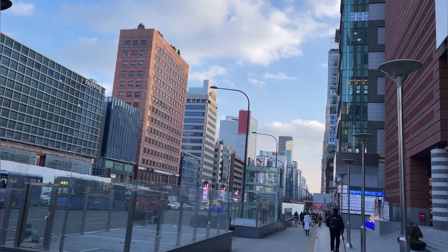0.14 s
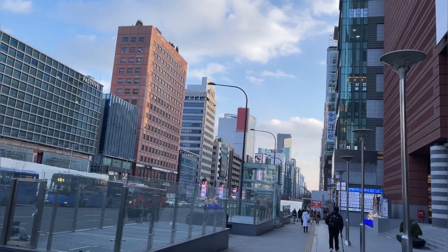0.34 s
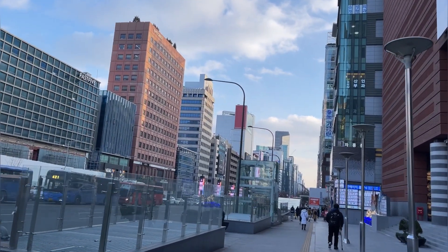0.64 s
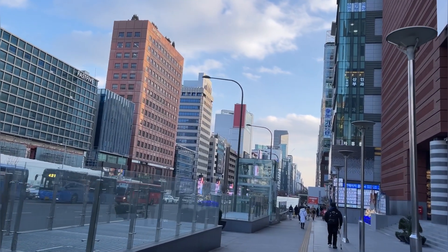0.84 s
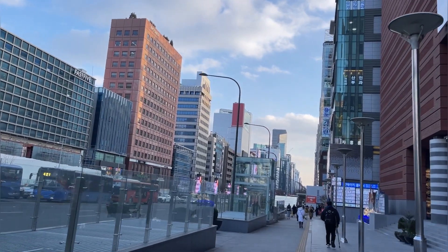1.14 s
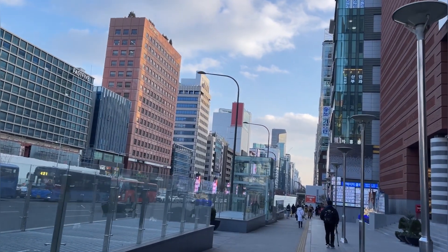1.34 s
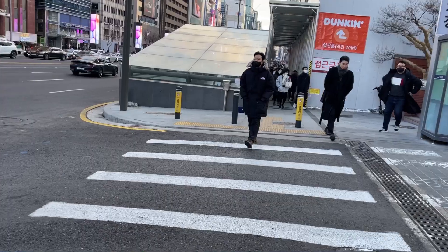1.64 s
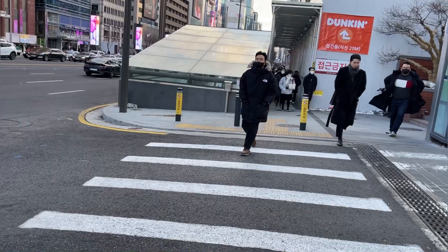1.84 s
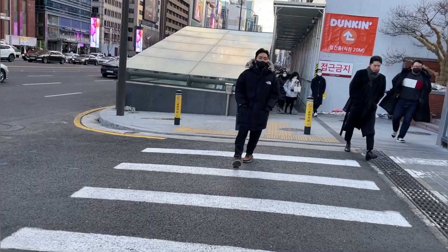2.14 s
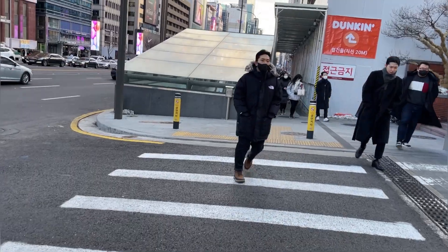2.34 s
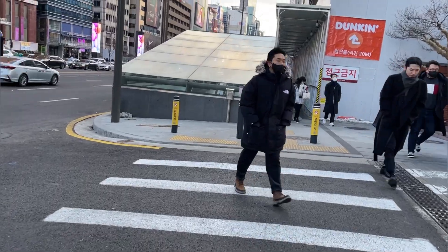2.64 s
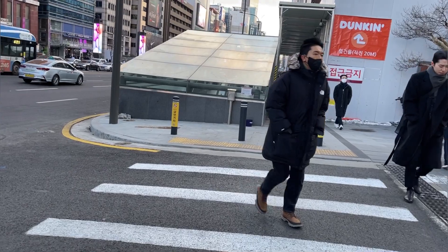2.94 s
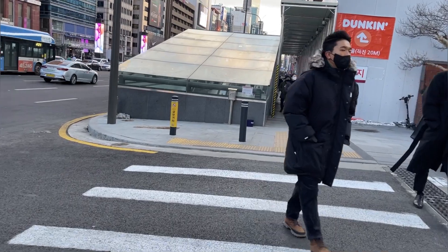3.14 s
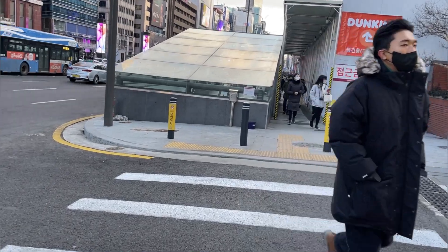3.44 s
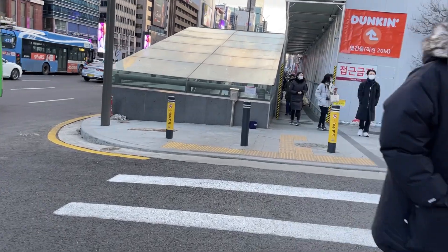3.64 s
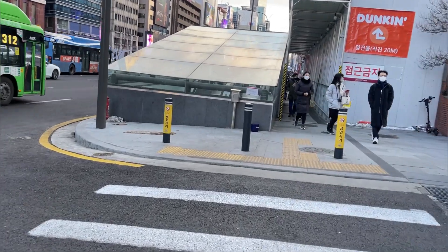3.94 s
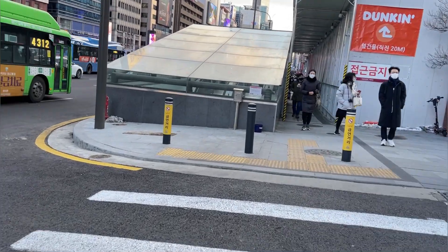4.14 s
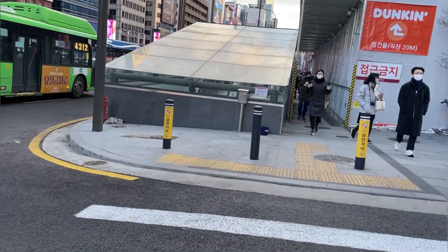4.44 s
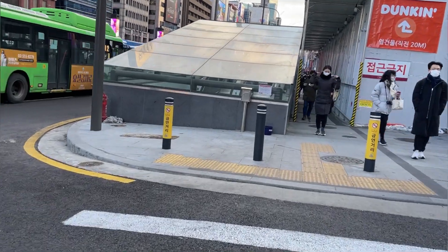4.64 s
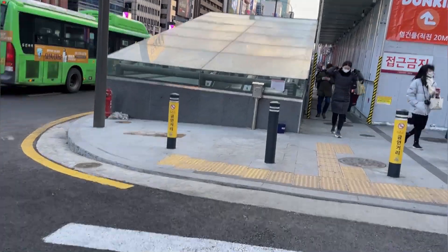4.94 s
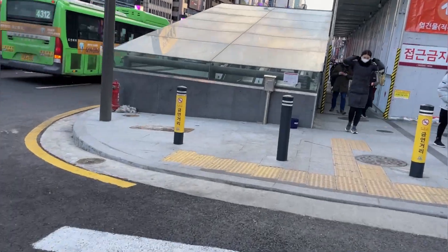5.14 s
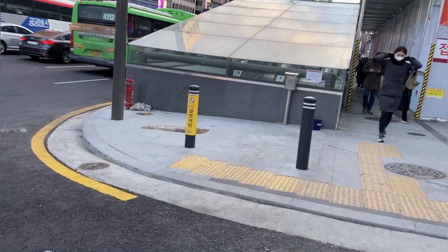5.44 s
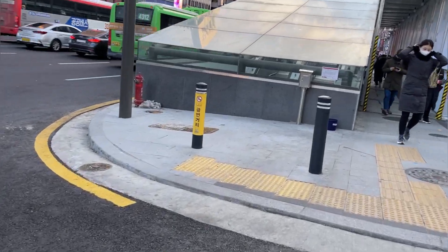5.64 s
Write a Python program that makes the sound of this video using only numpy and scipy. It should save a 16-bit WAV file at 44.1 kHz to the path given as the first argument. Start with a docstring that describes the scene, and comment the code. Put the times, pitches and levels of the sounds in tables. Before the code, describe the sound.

Windy street: buffeting bursts and sharp snaps, a sudden cut to a crossing, and a bus passing with rumble, tyre roar and falling drone.

```python
"""A city street on a windy day: gusts made of noise and sinking tones buffet two microphone ports.
Behind them is traffic, coloured noise louder on the left; at 1.57 s the avenue gives way to a crossing.
There a bus drives past: its body and tyres are noise that swells with nearness, while its exhaust and
drive are wavering tones, and the drone of the drive falls in pitch as it goes by.
A car ahead of the bus and cars behind it are noise too; one metallic chink is a fading tone."""
import sys
import numpy as np
from scipy import signal
from scipy.fft import rfft, irfft
from scipy.io import wavfile
from scipy.ndimage import uniform_filter1d

SR = 44100
rng = np.random.default_rng(int(sys.argv[2]) if len(sys.argv) > 2 else 0)


def dump(signal):
    """Clip the signal to [-1, 1] and save it as 16-bit WAV at the path in sys.argv[1]."""
    limited = np.clip(np.atleast_2d(signal).T, -1, 1)
    pcm = np.round(limited * 32767).astype(np.int16)
    wavfile.write(sys.argv[1], SR, pcm)


N = 255780
TIME = np.arange(N) / SR
BINS = np.fft.rfftfreq(N, 1 / SR)
CROSSING_S = 1.57  # the avenue gives way to the crossing


def gain_of(db):
    """Turns decibels into a factor for the amplitude."""
    return 10 ** (np.asarray(db) / 20)


def evened(x):
    """Scales a sound to an average strength (rms) of 1."""
    return x / np.sqrt(np.mean(x ** 2) + 1e-20)


def read(points):
    """Reads a table over frequency at every frequency bin, on a logarithmic scale."""
    hz, value = np.transpose(points)
    return np.interp(np.log(BINS + 1), np.log(hz + 1), value)


def level(rows, index, fade=0.21):
    """Turns a dB column into a gain that dies away outside the table's time span."""
    rows = np.array(rows)
    before = np.maximum(rows[0, 0] - TIME, 0)
    after = np.maximum(TIME - rows[-1, 0], 0)
    return gain_of(np.interp(TIME, rows[:, 0], rows[:, index])) * np.exp(-(before + after) / fade)


def envelope(start, length, attack, release):
    """Rises, holds to the end of its length, and dies away."""
    age = TIME - start
    return np.clip(age / attack, 0, 1) * np.exp(-np.maximum(age - length, 0) / release)


def step(s, width):
    """Goes smoothly from 0 to 1 around the given time."""
    return .5 + .5 * np.tanh((TIME - s) / (2 * width))


def wander(rate_hz):
    """Drifts at random with rms 1, mostly no faster than the given rate."""
    return evened(irfft(rfft(rng.standard_normal(N)) / (1 + (BINS / rate_hz) ** 4), N))


def tint(x, colour):
    """Filters by a spectrum, keeping the power of white noise."""
    return irfft(rfft(x) * evened(gain_of(read(colour))), N)


def pair(likeness):
    """Makes the spectra of two white noises that are partly the same, one for each port."""
    a, b = rfft(rng.standard_normal((2, N)))
    same = np.clip(likeness, 0, 1)
    return np.array([a, same * a + np.sqrt(1 - same ** 2) * b])


def sides_of(left_db):
    """Gains of the left and right port, with the left louder by left_db."""
    return gain_of(np.array([[left_db], [-left_db]]) / 2)


def shaped(x, shape):
    """Puts an envelope on a random signal and gives it the envelope's energy."""
    return x * shape * np.linalg.norm(shape) / np.linalg.norm(x * shape, axis=-1, keepdims=True)


def resonate(x, hz, width_hz):
    """Rings like a hollow space of gain 1 whose pitch follows the curve hz."""
    turn = np.exp(2j * np.pi * np.cumsum(hz) / SR)
    r = np.exp(-np.pi * width_hz / SR)
    return 2 * (turn * signal.lfilter([1 - r], [1, -r], x / turn)).real


def low_cut(x, corner_hz=65, lag_cycles=0.706):
    """The microphone's bass filter holds low tones back, so a push rings out as a falling thump."""
    lag = np.exp(-2j * np.pi * lag_cycles * np.log(1 + BINS / corner_hz))
    high_pass = signal.butter(2, corner_hz, "high", fs=SR, output="sos")
    return irfft(rfft(signal.sosfilt(high_pass, x)) * lag, N)


# how alike a near and a spread-out source are at the two ports: (frequency [Hz], likeness [0-1])
NEAR_LIKENESS = [(60, 1), (250, 0.73), (600, 0.66), (1400, 1), (2200, 1), (3600, 0.36), (4500, 0.7),
                 (5400, 0.2), (8400, 1), (12000, 1)]
FAR_LIKENESS = [(80, 1), (500, 0.82), (1300, 0.17), (2400, 0.39), (5400, 0.33), (8400, 0.3)]
# the extra path to the right port, near and spread-out: (frequency [Hz], lead of the left [rad])
NEAR_PHASE = [(0, 0), (600, 1.6), (2000, 6.4), (3200, 8.9), (4300, 13.1), (5300, 14.9), (6700, 18.6),
              (7600, 19.8), (8600, 18.8), (10100, 15.7), (11600, 12.6)]
FAR_PHASE = [(0, 0), (900, 1.6), (1900, 5.7), (2800, 7.1), (4000, 6.6), (5000, 7.3), (6400, 6.2),
             (7600, 7.2), (8600, 6.2), (10100, 3.15), (11600, 0)]


def street_noise(colour, likeness, phase, left_db):
    """Coloured noise from the roadway, with a delay and a level difference between the two ports."""
    z = pair(read(likeness))
    z[1] *= np.exp(-1j * np.interp(BINS, *np.transpose(phase))) * gain_of(-left_db)
    return evened(tint(irfft(z, N), colour))


def street_dip(start=0.653, hold=0.063, recovery=0.12, dip_db=-8):
    """The level of the street sound dips briefly under a hard gust."""
    return gain_of(dip_db * envelope(start, hold, attack=0.011, release=recovery))


# colours of the avenue's wash and of fine hiss: (frequency [Hz], relative level [dB])
AVENUE_COLOUR = [(25, -16), (50, 4), (200, -3), (500, -4.5), (850, -1), (1400, -15.5), (2200, -15.5),
                 (3200, -26.5), (7000, -23.5), (10000, -33)]
AIR_COLOUR = [(4000, -8), (6800, -17.5), (7900, -0.5), (9200, 1.5), (10300, 7.5), (11200, -1), (12400, -25)]


def avenue_traffic(wash_db=-37, hiss_db=-50):
    """Many cars merged into one steady wash of noise, with a fine hiss on top, up to the crossing."""
    wash = street_noise(AVENUE_COLOUR, FAR_LIKENESS, FAR_PHASE, left_db=2.5)
    hiss = street_noise(AIR_COLOUR, NEAR_LIKENESS, FAR_PHASE, left_db=-0.3)
    wash = wash * gain_of(wash_db) * (1 - step(CROSSING_S, 0.0023))
    return wash, hiss * gain_of(hiss_db) * (1 - step(CROSSING_S, 0.013))


# gusts on the ports, short hard ones riding on long light ones; levels are before the trims below:
# (start [s], length [s], low buffeting level [dB], flutter level [dB], flutter centre [Hz])
GUSTS = [(-.04, 0.9, -28.5, -33.5, 430), (0.256, 0.038, -18, -28, 507), (0.321, 0.077, -19, -22.5, 433),
         (0.46, 0.096, -21, -19.5, 464), (0.636, 0.07, -17, -25, 438), (0.76, 0.041, -21, -19.5, 380),
         (0.892, 0.088, -25, -25, 517), (0.937, 0.63, -25, -31, 406), (1.032, 0.16, -23, -25, 463),
         (1.216, 0.15, -26, -22.5, 563), (1.39, 0.068, -26, -25.5, 413), (1.519, 0.03, -28, -24.5, 530),
         (1.58, 0.99, -27.5, -32, 149), (2.14, 0.335, -25, -30.5, 170), (2.5, 0.28, -19.5, -25, 171),
         (2.568, 0.21, -26, -21, 267), (5.06, 0.21, -28, -25.5, 301)]
# colours of buffeting, flutter (moved up or down by each gust) and crackle:
# (frequency [Hz], relative level [dB])
BUFFET_COLOUR = [(15, -27), (30, -45), (50, 6), (85, 8), (160, -3), (260, -5), (450, -24), (1000, -62)]
FLUTTER_COLOUR = [(100, -6), (270, 0), (430, 5), (700, -0.5), (1100, -4), (1700, -15.5), (2600, -33),
                  (5000, -73)]
CRACKLE_COLOUR = [(600, -18), (1050, 5), (1500, 11), (2100, 2), (2800, -9.5), (4000, -14), (5300, -21),
                  (8000, -24), (12000, -34)]
GUST_ATTACK_S, GUST_RELEASE_S = 0.0041, 0.01
BUFFET_LAG_S = 0.0086  # the low buffeting trails the flutter
FLUTTER_HZ = 450  # a gust with this centre leaves the flutter colour where it is
FLUTTER_LEFT_DB = 2  # the left port faces the wind


def buffeting(low_db=1.0, mid_db=-5.5, lump_db=1.06, flutter_db=8.0, crackle_db=-31.0, tearing_db=11.0,
              hollow_db=1.0, hollow_hz=420, hollow_width_hz=170, roam=0.43):
    """Turbulent air presses on the ports: low lumps, a bursting flutter with a roaming ring, and crackle."""
    swirl = wander(63)
    low = tint(irfft(pair(0.63), N), BUFFET_COLOUR) * evened(gain_of(lump_db * swirl))
    # the faster flutter comes in sharper bursts, partly in step with the low lumps
    unrest = np.minimum(evened(0.5 * swirl + np.array([wander(250), wander(260)])), 2.8)
    churn = irfft(pair(0.35), N) * evened(gain_of(flutter_db * unrest))
    ring_hz = hollow_hz * np.exp(roam * wander(22))
    churn = churn + gain_of(hollow_db) * resonate(churn, ring_hz, hollow_width_hz)
    crackle = tint(irfft(pair(0.36), N) * evened(gain_of(tearing_db * unrest)), CRACKLE_COLOUR)
    push_power, mid = np.zeros(N), np.zeros((2, N))
    for start, length, push_db, churn_db, centre_hz in GUSTS:
        push = envelope(start + BUFFET_LAG_S, length, GUST_ATTACK_S, GUST_RELEASE_S)
        push_power += (gain_of(push_db) * push) ** 2
        # quick gusts flutter higher and crackle more
        speed = centre_hz / FLUTTER_HZ
        flutter = tint(churn, [(hz * speed, db) for hz, db in FLUTTER_COLOUR])
        flutter = flutter + gain_of(crackle_db) * speed ** 2 * crackle
        mid += flutter * gain_of(churn_db) * envelope(start, length, GUST_ATTACK_S, GUST_RELEASE_S)
    windward = sides_of(FLUTTER_LEFT_DB)
    low = np.sqrt(windward) * gain_of(low_db) * low * np.sqrt(push_power)
    return low + windward * gain_of(mid_db) * mid


# the hardest eddies inside the gusts; levels are before the trims below:
# (time [s], level [dB], centre [Hz], treble share [dB], low push [dB], length [s])
EDDIES = [(0.009, -25, 713, -38, -35, 0.018), (0.088, -28, 369, -36, -20, 0.006),
          (0.18, -21, 515, -36, -25, 0.007), (0.207, -24.5, 747, -14, -30, .004),
          (0.253, -15.5, 600, -20, -33, 0.014), (0.275, -14.5, 518, -30, -20, 0.0049),
          (0.298, -20, 557, -30, -31, 0.0034), (0.328, -20.5, 566, -30, -27, 0.0052),
          (0.343, -28, 300, -36, -13, 0.0062), (0.362, -16.5, 663, -40, -29, 0.0066),
          (0.385, -18, 341, -34, -18, 0.015), (0.422, -23.5, 565, -22, -20, 0.0074),
          (0.452, -12.5, 720, -36, -36, 0.0073), (0.49, -22.5, 850, -12, -30, 0.017),
          (0.558, -19, 544, -28, -15, 0.0057), (0.604, -27, 1050, -26, -18, 0.0088),
          (0.637, -19, 656, -22, -36, 0.0047), (0.646, -10, 595, -22, -13, 0.0044),
          (0.6573, -12, 1100, -10, -32, 0.0031), (0.678, -10, 456, -24, -10, 0.0019),
          (0.699, -14.5, 754, -15.5, -22, 0.0047), (0.745, -10, 615, -6, -10, 0.0091),
          (0.769, -18.5, 536, -15.5, -26, 0.014), (0.819, -32, 607, -25, -24, 0.0069),
          (0.91, -14, 800, -26, -26, 0.0035), (0.919, -13, 502.4, -30, -35, 0.015),
          (0.931, -12.5, 650, -12, -33, 0.0014), (0.954, -21, 650, -8, -29, 0.0045),
          (0.969, -27, 480, -11, -20, 0.01), (1.043, -9, 620, -22, -13, 0.0045),
          (1.063, -10, 564.6, -36, -34, 0.013), (1.13, -18, 375, -36, -28, 0.0046),
          (1.2, -22, 538, -30, -23, 0.0093), (1.23, -20, 712, -11.5, -14, 0.01),
          (1.273, -19.5, 782, -24, -23, 0.0097), (1.317, -15, 614, -19.5, -12, 0.016),
          (1.416, -13.5, 485, -23, -21, 0.0047), (1.451, -23, 474, -14.5, -15, 0.0083),
          (1.517, -17.5, 749, -32, -29, 0.0066), (2.422, -13.5, 273.4, -38, -24, 0.01),
          (2.536, -17, 204, -40, -10, 0.013), (2.631, -13, 380, -28, -24, 0.0061),
          (2.675, -16, 482, -28, -24, 0.006), (2.784, -18, 383, -39, -24, 0.017)]
EDDY_LEFT_DB = 1.5  # the wind comes from the left


def eddies(body_db=0.1, crackle_db=2.0, push_db=11.5, push_time=0.00163, ragged_db=5.5,
           top_share=1.41, ring_share=0.45, sag=0.25):
    """Each eddy is a ragged burst around a sinking note, with a push of pressure under it."""
    body, crackle, push = np.zeros((3, 2, N))
    churn = evened(irfft(pair(0.12), N))
    ragged, waver = gain_of(ragged_db * wander(350)), 0.173 * wander(207)
    sides = sides_of(EDDY_LEFT_DB)
    for s, peak_db, centre_hz, treble_db, low_db, length in EDDIES:
        at = slice(max(round((s - .05) * SR), 0), round((s + .05) * SR))
        age = TIME[at] - s
        burst = 1 / (1 + (2 * age / length) ** 2)
        edges_hz = [centre_hz * .4, centre_hz * top_share]
        band = signal.butter(N=3, Wn=edges_hz, btype="band", fs=SR, output="sos")
        noise = evened(signal.sosfilt(band, churn[:, at]))
        pitch = centre_hz * (1 - sag * np.tanh(age / length) + waver[at])
        port_turn = np.array([[0], [np.pi / 3]])
        ring = np.cos(2 * np.pi * np.cumsum(pitch) / SR + rng.uniform(0, 2 * np.pi) + port_turn)
        body[:, at] += sides * gain_of(peak_db) * shaped(noise + ring_share * ring, burst)
        crest = 1 / (1 + (1.52 * age / length) ** 4)  # only the crest tears
        crackle[:, at] += sides * gain_of(peak_db + treble_db) * shaped(ragged[at], crest)
        # pressure rises, swings below zero and settles
        v = np.maximum(age + push_time, 0) / push_time
        push[:, at] += np.sqrt(sides) * gain_of(low_db) * v * (2 - v) * np.exp(-v)
    sparks = tint(crackle * irfft(pair(0.3), N), CRACKLE_COLOUR)
    return gain_of(body_db) * body + gain_of(crackle_db) * sparks + gain_of(push_db) * low_cut(push)


# sharp snaps where the airflow breaks at a port; the level is before the bass filter and the sides:
# (time [s], peak level [dB], upper edge [Hz])
SNAPS = [(0.2535, -14, 2130), (0.2595, -15.5, 2450), (0.2695, -13, 2030), (0.278, -25, 2300),
         (0.3555, -12.5, 1670), (0.362, -19, 1850), (0.501, -4, 1500), (0.5425, -11, 1400),
         (0.648, -22, 2580), (0.6555, -17, 2300), (0.6798, -24, 3200), (0.686, -22, 2600),
         (0.738, -9, 2970), (0.7418, -8, 4550), (0.7443, -13, 2620), (0.748, -14, 3880),
         (0.7525, -19, 2380), (0.8105, -23, 2000), (0.9328, -10.5, 2200), (0.9342, -14, 3080),
         (0.953, -28, 2600), (1.04, -23, 2516), (1.1073, -21.5, 2230), (1.2674, -24, 1250),
         (1.3213, -21, 1600), (1.352, -22, 1800), (1.382, -22, 1600), (1.405, -10.5, 1230),
         (1.416, -18, 1570), (1.519, -14, 1670), (2.592, -15.5, 1700)]


def snaps(lowest_hz=480, left_db=9.5, rattle_db=-20.0, rattle_s=0.00089):
    """The airflow breaks at a port: a sharp jump of pressure, duller or brighter, with a short ragged tail."""
    out, age = np.zeros(N), TIME[:1024]
    bass_cut = signal.butter(N=2, Wn=lowest_hz, btype="high", fs=SR, output="sos")
    for s, peak_db, edge_hz in SNAPS:
        treble_cut = signal.butter(N=7, Wn=edge_hz, fs=SR, output="sos")
        tail = evened(rng.standard_normal(len(age)) ** 3)  # cubing makes it spiky
        tail = tail * np.exp(-age / rattle_s) / np.sqrt(edge_hz * rattle_s)
        jump = signal.unit_impulse(len(age)) + gain_of(rattle_db) * tail
        click = signal.sosfilt(np.vstack([treble_cut, bass_cut]), jump)
        out[round(s * SR):][:len(click)] -= gain_of(peak_db) * click / abs(click).max()
    return sides_of(left_db) * low_cut(out)


# eddies that strike a port squarely, each a thump that sinks in pitch; the level is before the sides:
# (time [s], level [dB], first pitch [Hz], last pitch [Hz])
THUMPS = [(0.273, -14.5, 600, 85), (0.499, -4.5, 980, 129), (0.5422, -7.5, 1100, 333),
          (0.6558, -2.5, 1360, 76), (0.699, -11.5, 500, 81), (0.769, -9.5, 200, 41.6),
          (1.04, -11, 746, 170), (1.061, -6, 650, 254), (1.4039, -11.5, 750, 131), (1.447, -14.5, 350, 55),
          (2.272, -10, 230, 70), (2.322, -9.5, 327, 110), (2.367, -6.5, 136, 38), (2.413, -6, 400, 130),
          (2.571, -7.5, 500, 140), (2.589, -4, 624, 64.5), (2.631, -6.5, 480, 80), (2.673, -3.5, 617, 100),
          (2.698, -6, 585, 130), (2.726, -8, 420, 69), (2.767, -5, 560, 150)]
THUMP_STRETCH = 0.6  # each cycle lasts e^0.6, or about 1.8, times as long as the one before


def thumps(left_db=-1.5, port_spread=0.3, fullness=0.62):
    """A blow of air rings through the microphone for a few ever longer cycles, differing at each port."""
    out, age = np.zeros((2, N)), TIME[:4096]
    for s, peak_db, first_hz, last_hz in THUMPS:
        turns = np.log(1 + THUMP_STRETCH * first_hz * age) / THUMP_STRETCH
        progress = np.minimum(turns * THUMP_STRETCH / np.log(first_hz / last_hz), 1)
        swell = np.maximum(np.sin(np.pi * progress), 0) ** fullness
        port_turn = port_spread * rng.standard_normal((2, 1))
        ring = np.sin(2 * np.pi * turns + port_turn)
        out[:, round(s * SR):][:, :len(age)] -= gain_of(peak_db) * swell * ring
    return sides_of(left_db) * out


# traffic all around the crossing: (time [s], level [dB])
TRAFFIC = [(1.585, -24.5), (2.2, -25.5), (3.0, -26), (4.3, -25), (4.8, -23.5), (5.3, -22.5), (5.8, -25.5)]
# its colour: (frequency [Hz], relative level [dB])
TRAFFIC_COLOUR = [(20, -41), (45, 3.5), (90, -1), (200, -5.5), (400, -12.5), (900, -12.5), (1400, -20.5),
                  (2200, -26.5), (3000, -34.5), (4000, -38.5), (6800, -40.5), (10000, -60)]


def crossing_traffic():
    """Many cars merged into one wash of noise that rises and falls."""
    wash = street_noise(TRAFFIC_COLOUR, FAR_LIKENESS, FAR_PHASE, left_db=2.5)
    return wash * level(TRAFFIC, 1, fade=0.0061)


# the bus goes by at steady speed, then slips behind a station entrance
BUS_CLOSEST_S, BUS_DISTANCE_M, BUS_SPEED_M_PER_S = 3.75, 11.75, 10.06
HIDDEN_S, HIDING_S = 4.36, 0.053


def bus_pass(falloff, hidden_db):
    """Gain of a part of the bus: it falls with distance, the faster the more it radiates sideways."""
    distance = np.hypot(BUS_DISTANCE_M, BUS_SPEED_M_PER_S * (TIME - BUS_CLOSEST_S))
    return (BUS_DISTANCE_M / distance) ** falloff * gain_of(hidden_db * step(HIDDEN_S, HIDING_S))


# fine hiss trailing the bus: (time [s], level [dB])
WAKE = [(4.3, -54), (4.6, -45.5), (5.15, -44), (5.8, -50)]
# colours of the shaking body and of the tyres: (frequency [Hz], relative level [dB])
RUMBLE_COLOUR = [(22, -61), (50, -1), (75, -0.5), (110, -1.5), (170, 0), (225, 1.5), (330, -3.5), (500, -9),
                 (800, -15), (1300, -28), (3000, -78)]
TYRE_COLOUR = [(200, -6), (600, 4.5), (900, 9.5), (1330, 1), (2000, 1.5), (2480, -3), (3000, -10.5),
               (3700, -17.5), (4400, -12.5), (5600, -18.5), (7000, -18), (7900, -11), (9000, -25.5)]


def bus_rolling(rumble_db=-16.0, tyre_db=-24.0, hiss_db=-39.5, shake_db=0.7, tread_db=0.5, grit_db=0.65):
    """The body shakes and the tyres roar and hiss over uneven asphalt, as noise that swells with nearness."""
    rumble = street_noise(RUMBLE_COLOUR, NEAR_LIKENESS, NEAR_PHASE, left_db=1.0)
    rumble = rumble * bus_pass(falloff=1.86, hidden_db=-3.5) * gain_of(rumble_db + shake_db * wander(8.5))
    tyres = street_noise(TYRE_COLOUR, NEAR_LIKENESS, NEAR_PHASE, left_db=1.0)
    unevenness_db = tread_db * wander(60) + grit_db * wander(260)
    tyres = tyres * bus_pass(falloff=2.78, hidden_db=-8.5) * gain_of(tyre_db + unevenness_db)
    hiss = street_noise(AIR_COLOUR, NEAR_LIKENESS, FAR_PHASE, left_db=0.0)
    passing = gain_of(hiss_db) * bus_pass(falloff=2.02, hidden_db=-1.5)
    hiss = hiss * np.hypot(passing, level(WAKE, 1))
    return (rumble + tyres + hiss) * step(CROSSING_S, 0.024)


def engine_note(pitch, loud, second_db, half_db, echo_share, jitter, lead=0.00062):
    """A wavering engine tone with its octaves; echoes off the buildings make it swell and fade."""
    port_lead = pitch * np.array([[0], [lead]])  # the right port hears it later by lead seconds
    turns = np.cumsum(pitch * (1 + jitter * wander(17.8))) / SR - port_lead
    # when the note is loud, the direct path outweighs the echoes
    echoes = echo_share * (1 - .75 * loud / loud.max())
    paths = 1 + echoes * (wander(10) + 1j * wander(10))
    cycle = np.exp(2j * np.pi * turns)
    uneven_firing = gain_of(half_db) * np.cos(np.pi * turns)  # an octave below
    return evened((paths * cycle + gain_of(second_db) * cycle ** 2).real + uneven_firing) * loud


# the drive climbs slowly in pitch, swells under load, and drops as at a gear change:
# (time [s], pitch [Hz], level [dB])
DRONE = [(1.63, 266, -29), (1.74, 264.2, -24.5), (2.0, 263, -27.5), (2.09, 260.4, -50), (2.18, 266, -27.5),
         (2.55, 267.7, -23.5), (3.08, 268.7, -19.5), (3.38, 270, -27), (3.51, 272, -20.5),
         (3.8, 268, -24.5), (4.02, 267.7, -13.5), (4.12, 258, -15), (4.22, 247, -13), (4.3, 229, -21),
         (4.38, 208, -23.5), (4.47, 195.4, -20.5), (4.57, 197, -27), (4.67, 197.4, -21.5), (4.88, 196, -32),
         (5.2, 191, -26.5), (5.4, 195.8, -27), (5.55, 193, -25), (5.8, 194, -29)]


def bus_drive(gears_db=-18.5, gears_ratio=0.94):
    """The drive drones, swells and drops to a lower note; close by, a rougher hum lies just under it."""
    pitch = uniform_filter1d(np.interp(TIME, *np.transpose(DRONE)[:2]), size=2205)  # glides over 50 ms
    drone = engine_note(pitch, level(DRONE, 2, fade=0.03),
                        second_db=-19, half_db=-34, echo_share=0.3, jitter=0.0055)
    gears_loud = gain_of(gears_db) * bus_pass(falloff=15, hidden_db=-12)
    gears = engine_note(pitch * gears_ratio, gears_loud,
                        second_db=-27, half_db=-23, echo_share=1.53, jitter=0.038)
    return drone + gears


# hiss of a car's tyres ahead of the bus: (time [s], level [dB])
LEAD_CAR = [(1.7, -55), (2.1, -48.5), (2.5, -45), (3.0, -45.5), (3.2, -47), (3.5, -51)]
# its colour: (frequency [Hz], relative level [dB])
LEAD_CAR_COLOUR = [(2500, -7), (4200, 0.5), (5700, 3), (6800, 3), (9000, -19)]


def lead_car():
    """The tyres of a car ahead of the bus hiss as bright noise on the left."""
    return street_noise(LEAD_CAR_COLOUR, FAR_LIKENESS, NEAR_PHASE, left_db=4.5) * level(LEAD_CAR, 1)


# exhaust notes:
# (start [s], length [s], first pitch [Hz], last pitch [Hz], level [dB], relative uneven firing [dB])
EXHAUST = [(2.7, 0.894, 62.3, 63.9, -14.5, -38), (3.77, 0.099, 62.2, 61.5, -19, -27),
           (3.72, 0.17, 90.5, 90.8, -19.5, -20), (4.26, 0.54, 64.13, 71.3, -23.5, -33),
           (4.57, 0.63, 89.5, 90.36, -21, -9), (5.307, 0.35, 91.7, 91.7, -21, -6)]
EXHAUST_ATTACK_S, EXHAUST_RELEASE_S = 0.054, 0.08


def bus_exhaust():
    """The exhaust booms on the approach and hums on the way out, in notes that hold or drift in pitch."""
    out = np.zeros((2, N))
    for start, length, first_hz, last_hz, db, uneven_db in EXHAUST:
        pitch = np.interp(TIME, [start, start + length], [first_hz, last_hz])
        loud = gain_of(db) * envelope(start, length, EXHAUST_ATTACK_S, EXHAUST_RELEASE_S)
        out += engine_note(pitch, loud, second_db=-16.0, half_db=uneven_db, echo_share=0.23, jitter=0.0024)
    return out


# the cooling fan at the bus's rear: (time [s], level [dB])
FAN = [(3.8, -48), (4.2, -38), (4.5, -44), (4.68, -40), (5.1, -46.5), (5.6, -52)]
# its colour: (frequency [Hz], relative level [dB])
FAN_COLOUR = [(1500, -6), (2400, 1), (2900, -2.5), (3400, -8), (4500, -23), (6000, -13), (9000, -34)]


def bus_fan():
    """The rear cooling fan comes into earshot as noise on the left."""
    return street_noise(FAN_COLOUR, FAR_LIKENESS, FAR_PHASE, left_db=7.0) * level(FAN, 1)


# cars following the bus: (time [s], level [dB])
CARS = [(4.5, -53), (4.9, -48), (5.25, -60), (5.5, -38), (5.8, -33.5)]
# their colour: (frequency [Hz], relative level [dB])
CAR_COLOUR = [(200, -15), (550, -11), (850, 6), (1150, 6), (1500, -5), (2200, -5), (4000, -44)]


def following_cars():
    """Cars behind the bus are a band of noise that grows towards the end."""
    return street_noise(CAR_COLOUR, FAR_LIKENESS, FAR_PHASE, left_db=.5) * level(CARS, 1, fade=.3)


def chink(start=4.86, hz=2800, level_db=-33, decay=0.017):
    """One short metallic chink from the roadway: a pure tone that starts fast and dies away."""
    age = np.maximum(TIME - start, 0)
    strike = (1 - np.exp(-age / 0.00046)) * np.exp(-age / decay)
    return gain_of(level_db) * strike * np.sin(2 * np.pi * hz * age)


def scene():
    """Street, wind and bus at the two ports."""
    avenue, hiss = avenue_traffic()
    street = street_dip() * (avenue + hiss + crossing_traffic() + lead_car() + following_cars())
    wind = buffeting() + eddies() + snaps() + thumps()
    bus = bus_rolling() + bus_drive() + bus_exhaust() + bus_fan()
    return street + wind + bus + chink()


def record(dry, ceiling=0.95, edge_hz=12450):
    """Soft overload on the loudest peaks, then a steep cut of the treble above edge_hz."""
    held = dry / (1 + (dry / ceiling) ** 6) ** (1 / 6)
    treble_cut = signal.firwin(511, edge_hz, window=("kaiser", 9), fs=SR)
    return signal.oaconvolve(held, treble_cut[None], "same")


dry = scene()
out = record(dry)
dump(out)
```